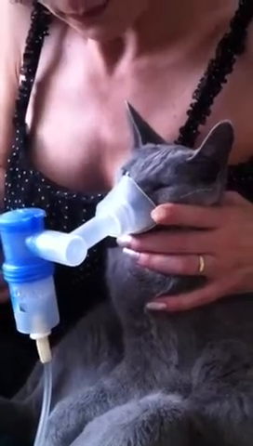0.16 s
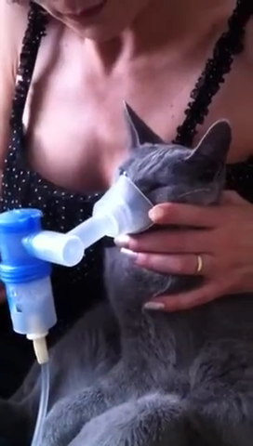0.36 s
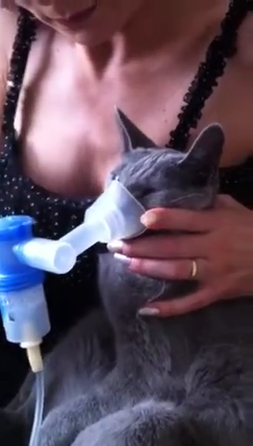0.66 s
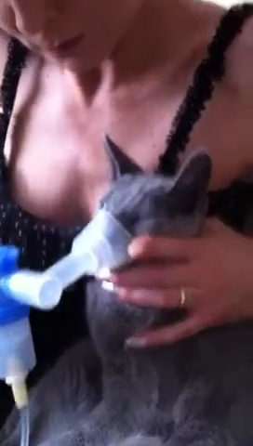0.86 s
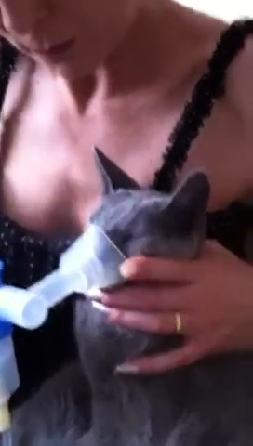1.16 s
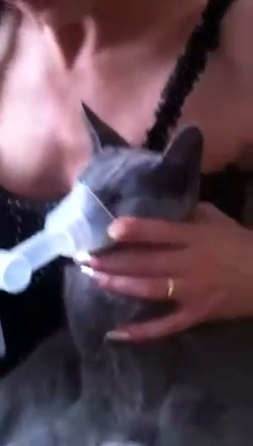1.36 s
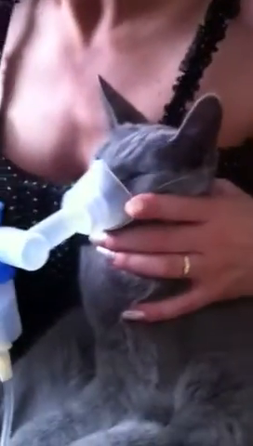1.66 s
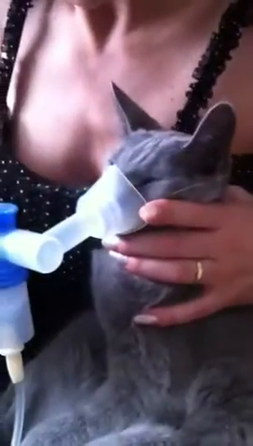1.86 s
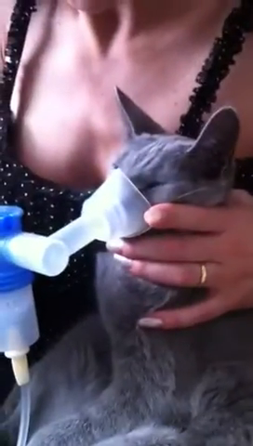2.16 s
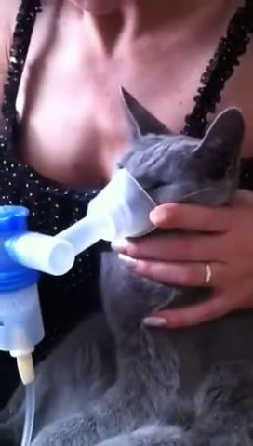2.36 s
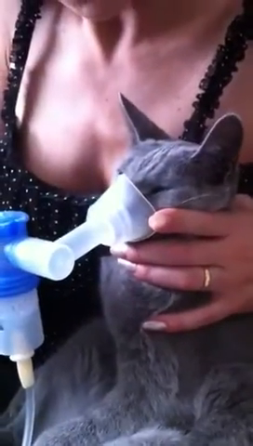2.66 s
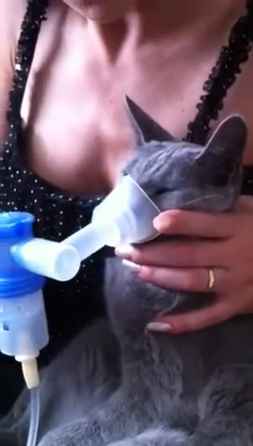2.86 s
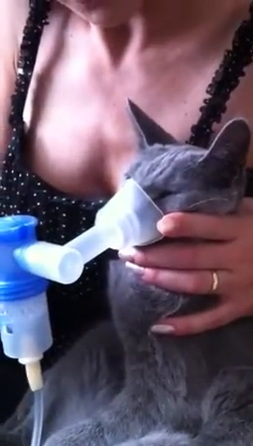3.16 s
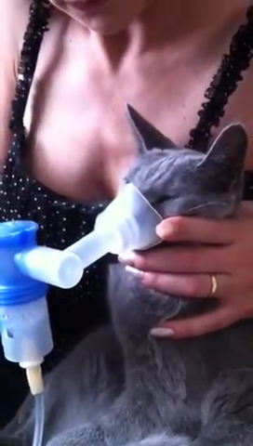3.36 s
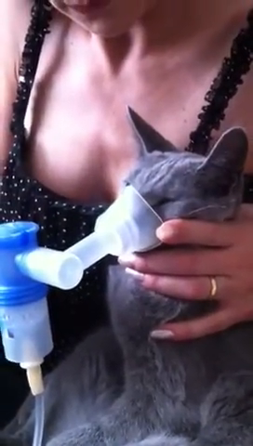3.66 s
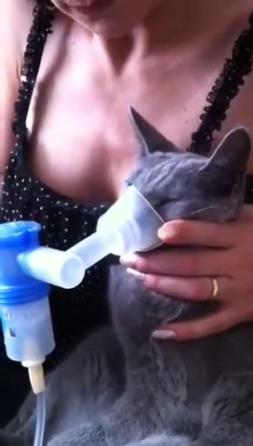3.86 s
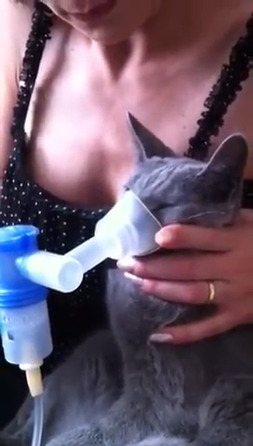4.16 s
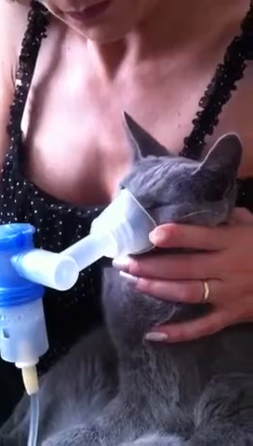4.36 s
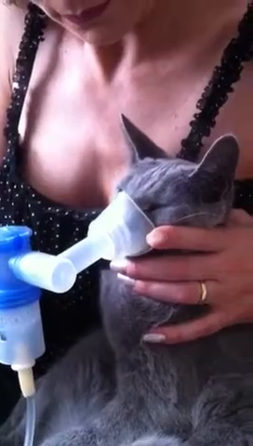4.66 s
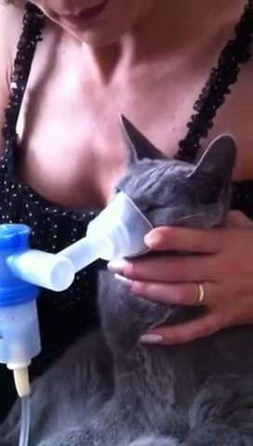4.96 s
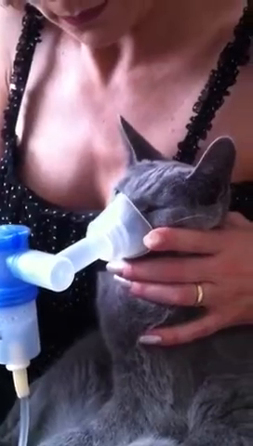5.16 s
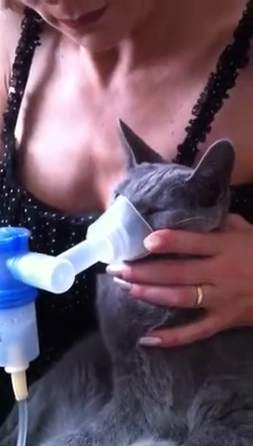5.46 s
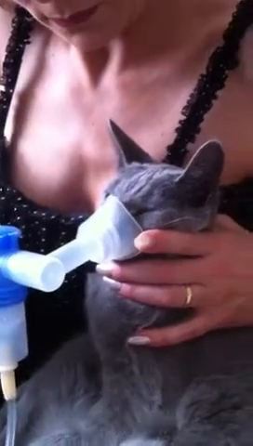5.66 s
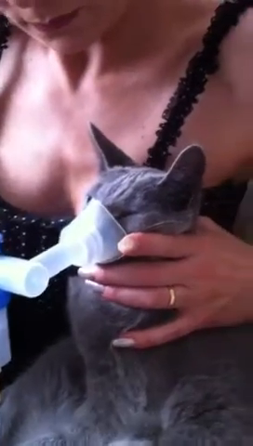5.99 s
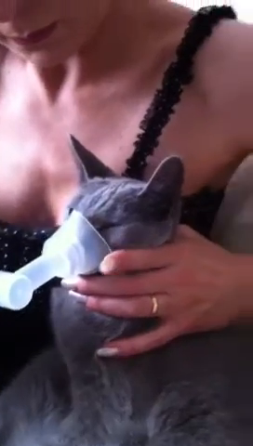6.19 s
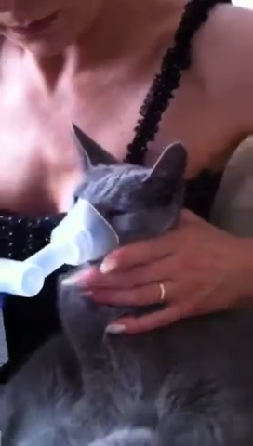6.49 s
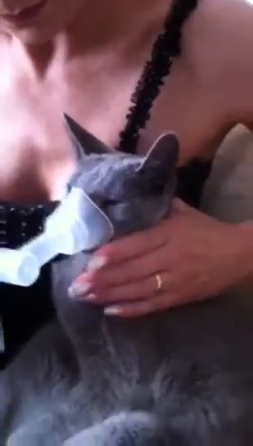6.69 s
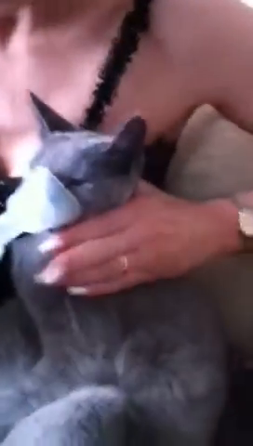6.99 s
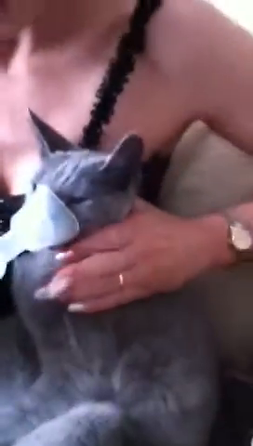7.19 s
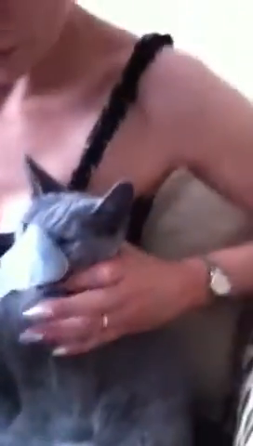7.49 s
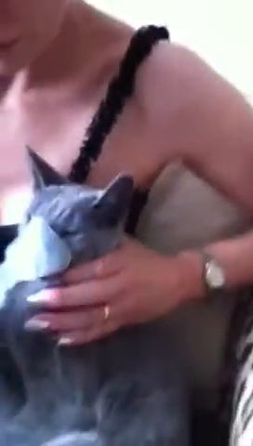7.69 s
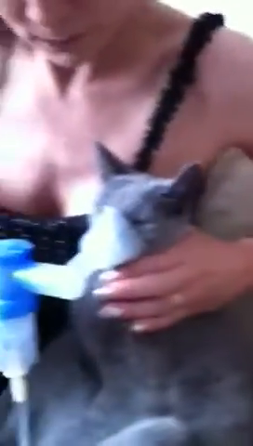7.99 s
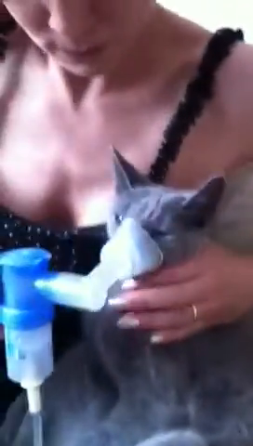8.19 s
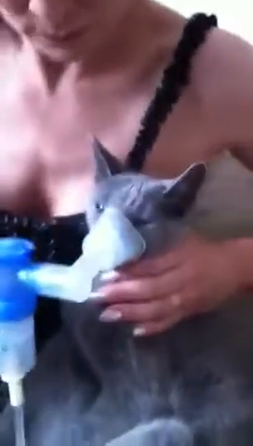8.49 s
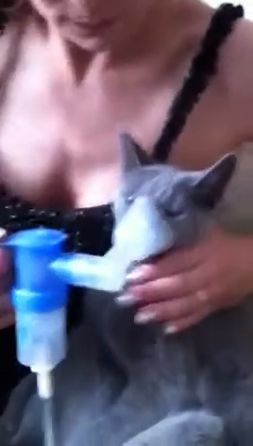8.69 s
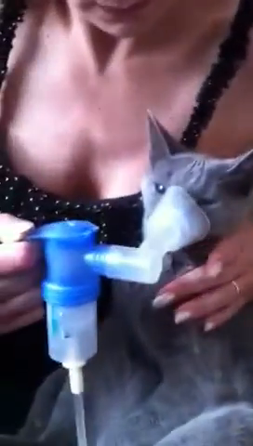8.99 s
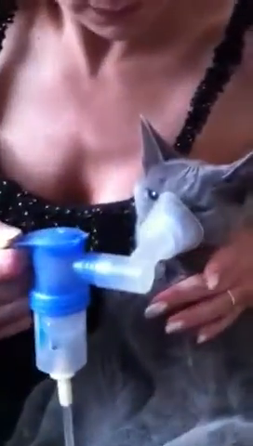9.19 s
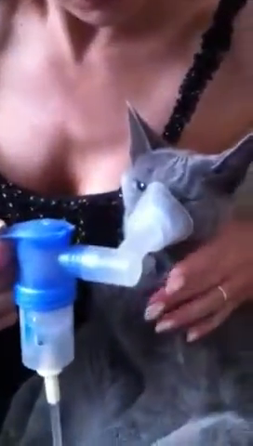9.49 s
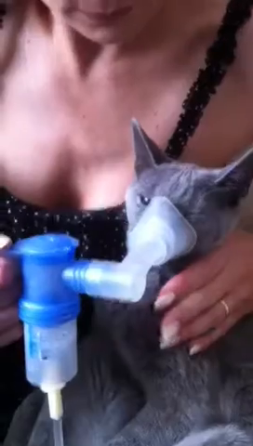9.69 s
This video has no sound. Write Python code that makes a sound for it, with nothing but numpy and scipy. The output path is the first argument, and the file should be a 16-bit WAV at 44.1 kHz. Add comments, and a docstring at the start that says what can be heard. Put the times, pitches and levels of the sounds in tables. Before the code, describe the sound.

Indoors, a nebulizer runs without pause: buzzing low-mid motor hum, airy high hiss and a subtle bubbling sputter from the cup. The level stays nearly even with slight flutter. After more than seven seconds a tight pair of plastic clicks snaps close to the microphone, and the tone smoothly changes as cup and microphone turn. The cat makes no sound. Mono, close and dry.

```python
"""A nebulizer runs while its mask is held to a cat's face; the cat itself stays silent.
From the start the piston compressor hums at 44 turns a second over a low rumble, while spray sputters
and gurgles in the plastic medicine cup and the air jet hisses. At 3.6 s the hum's phase slips by a fraction
of a millisecond, with a faint low bump. Just after 7.6 s two sharp clicks sound close by, the louder with a bump.
Around 8 s cup and microphone turn smoothly, which changes the colour of hiss, gurgle and hum."""
import sys
import numpy as np
from scipy import signal
from scipy.fft import rfft, irfft, next_fast_len
from scipy.io import wavfile
from scipy.ndimage import uniform_filter1d, map_coordinates

SR = 44100
rng = np.random.default_rng(int(sys.argv[2]) if len(sys.argv) > 2 else 0)


def to_wav(sig):
    """Store sig (one row per channel, or 1-D mono) as 16-bit WAV at the path in sys.argv[1].

    Samples outside -1..1 are clipped; the rate is SR.
    """
    pcm = np.clip(np.atleast_2d(sig), -1, 1) * 32767
    pcm = np.round(pcm).astype(np.int16)
    wavfile.write(sys.argv[1], SR, pcm.T)  # frames by channels


N = 433944

SHAFT_HZ = 44.335
# piston and valve knocks of one turn: (place in the turn [0-1], signed push [relative])
KNOCKS = [(.32, .58), (.357, .69), (.404, .16), (.766, 1)]
# resonances of the pump housing: (centre [Hz], width [Hz], weight [dB])
HOUSING_MODES = [(280, 30, .6), (675, 41, 0), (860, 60, 4)]
# hum lines of the shaft, before facing and flutter:
# (shaft multiple, rms level before the turn [dB], rms level after it [dB])
HUM_LINES = [(2, -80.0, -80), (3, -72.5, -72), (4, -52.0, -51.2), (5, -68, -68), (6, -52.5, -53.6),
             (7, -65, -66.5), (8, -61, -99), (9, -65, -58.5), (10, -68, -62.5), (11, -66, -58.5),
             (12, -67, -65), (13, -59, -54), (14, -52.5, -52), (15, -55.5, -47), (16, -47, -48),
             (17, -54.5, -56), (18, -67.5, -95), (19, -64, -61), (20, -56.5, -60.5), (21, -61.5, -76),
             (22, -68, -64), (23, -71, -70)]
# faint upper buzz of the pump, before chance spread and flutter: (frequency [Hz], rms level per line [dB])
UPPER_BUZZ = [(1060, -75), (1500, -74), (1900, -79), (2200, -82), (2700, -85.5)]
# steady motor tones: (frequency [Hz], rms level [dB])
MOTOR_TONES = [(100, -86), (144.3, -66), (786.7, -67), (875.4, -70)]
# how openly the pump faces the microphone: (time [s], gain [dB])
PUMP_FACING = [(1.0, -1.0), (1.5, -0.6), (5.9, -0.35), (7.4, 1), (8.5, -0.04)]


def compressor(turns, flutter_db=0.22):
    """Each turn repeats the same knocks, so the pump sounds as a stack of lines at shaft multiples."""
    t = np.arange(N) / SR
    turned = turned_share()
    facing = amp(curves(PUMP_FACING)[0])
    shaft = np.exp(2j * np.pi * turns)
    hum = np.zeros(N)
    for multiple, first_db, turned_db in HUM_LINES:
        hz = multiple * SHAFT_HZ
        # knocks and housing set only the phase: when in the turn each line peaks
        drive = sum(push * np.exp(-2j * np.pi * multiple * place) for place, push in KNOCKS)
        body = sum(amp(db) * 1j * hz * width / (centre ** 2 - hz ** 2 + 1j * hz * width)
                   for centre, width, db in HOUSING_MODES)
        phase = drive * body / abs(drive * body)
        level = amp(first_db) * (1 - turned) + amp(turned_db) * turned
        if hz > 500:
            level = level * facing  # only the short waves are shaded
        hum += level * np.real(shaft ** multiple * phase)
    for multiple in range(24, 61):
        level = amp(along(UPPER_BUZZ, multiple * SHAFT_HZ) + 2 * rng.normal())
        phase = np.exp(2j * np.pi * rng.random())
        hum += level * np.real(shaft ** multiple * phase)
    motor = sum(amp(db) * np.cos(2 * np.pi * (hz * t + rng.random())) for hz, db in MOTOR_TONES)
    flutter = amp(flutter_db * wobble(rate=28))
    return np.sqrt(2) * (hum * flutter + motor)  # root 2 makes the line levels rms


MAINS_HZ = 50
START_TURNS = .087  # phase at the start
PHASE_SLIP = (3.572, .006, .016)  # the hum's phase slips ahead once: (time [s], length [s], slip [turns])


def shaft_turns(hunt=0.0023, jitter=0.00032, drift=0.0033):
    """Phase of hum and strokes in turns; the motor's torque ripple beats with the two strokes 11 times a second."""
    t = np.arange(N) / SR
    beat = np.sin(2 * np.pi * 2 * (MAINS_HZ - SHAFT_HZ) * t)
    when, length, slipped = PHASE_SLIP
    slip = slipped * np.clip((t - when) / length, 0, 1)
    unevenness = hunt * beat + jitter * wobble(rate=29) + drift * wobble(rate=3)
    return START_TURNS + SHAFT_HZ * t + slip + unevenness


# colour of the spray's hiss in the cup, before and after the turn: (frequency [Hz], relative density [dB])
HISS_FIRST = [(1940, -42), (3300, -22), (3650, -20.5), (3870, -4.5), (3990, -2), (4150, -3.5), (4330, -10),
              (4500, -7), (4850, -4), (5030, 0.5), (5190, 7.5), (5360, 0), (5830, -12.5), (6350, -15),
              (6700, -47), (8710, -48), (14700, -120)]
HISS_TURNED = [(1940, -26), (3300, -17), (3540, -17), (3820, 1), (4010, -0.5), (4150, -6), (4570, 1.5),
               (4850, 1.5), (5210, 7.5), (5410, 3), (5830, -8), (6490, -19), (6700, -30), (8710, -54),
               (14700, -120)]
# colour of the liquid's gurgle, before and after the turn: (frequency [Hz], relative density [dB])
GURGLE_FIRST = [(700, -41), (1000, -14.5), (1300, -7), (1470, -5.5), (1580, 1.5), (1720, -10.5),
                (1950, -17.5), (2600, -24.5), (3400, -45)]
GURGLE_AFTER_TURN = [(700, -36), (1000, -18), (1150, 0.5), (1330, -3), (1540, 2), (1720, -5.5), (1950, -16),
                     (2600, -25), (3400, -52)]
# hiss of the spray as the hand-held cup sways, before surges: (time [s], level [dB])
CUP_SWAY = [(.7, -48.7), (1.7, -46), (6.0, -47), (6.8, -46), (8.4, -48), (9.1, -46.5)]
# the gurgle's level before surges [dB], depth of its chance surges [dB], their rate [knots per s]
GURGLE_DB, SURGE_DB, SURGE_RATE = -55, 0.95, 5
STROKE_PLACE = 0.63  # place of the pressure stroke in the turn (0-1)


def mist(turns, hiss_surge_db=0.63):
    """Liquid is torn up in spurts, which gurgle low and hiss in the cup's resonances."""
    turned = turned_share()

    def in_cup(x, first, last):
        """Crossfade from the first colour to the last as the cup turns."""
        return (1 - turned) * coloured(x, first) + turned * coloured(x, last)

    surge = wobble(SURGE_RATE)
    gurgle = in_cup(sputter(rate=90, depth_db=2.0), GURGLE_FIRST, GURGLE_AFTER_TURN)
    # each pressure stroke throws more spray
    spray = sputter(rate=130, depth_db=0.7) * stroke(turns, STROKE_PLACE, depth_db=0.5)
    hiss = in_cup(spray, HISS_FIRST, HISS_TURNED)
    gurgle_gain = amp(GURGLE_DB + SURGE_DB * surge)
    hiss_gain = amp(curves(CUP_SWAY)[0] + hiss_surge_db * surge)
    return gurgle_gain * gurgle + hiss_gain * hiss


def sputter(rate, depth_db):
    """White noise that comes in uneven spurts."""
    return rng.standard_normal(N) * amp(depth_db * wobble(rate))


def stroke(turns, place, depth_db):
    """A gain that swells once a turn, at the given place in the turn."""
    return amp(depth_db * np.cos(np.pi * (turns - place)) ** 8)


# colour of the escaping air: (frequency [Hz], relative density [dB])
JET_AIR = [(1500, -21), (2100, -1), (2750, -5), (3200, -1.5), (4500, -17), (6700, -9), (8500, -4),
           (10200, -5.5), (12300, 2.5), (13300, -2), (14200, -15), (15600, -7.5)]
# narrow resonances of the nozzle and mouthpiece: (centre [Hz], width [Hz], lift [dB])
NOZZLE_PEAKS = [(7250, 380, 7), (9500, 320, 5.5), (10820, 270, 5)]
# level against the cup's mean hiss [dB], share of the sway it follows, gain once the cup has turned [dB]
JET_UNDER_DB, JET_FOLLOWS, JET_TURNED_DB = -9.5, 0.63, 0.7


def jet(drift_db=1.76):
    """Smooth high hiss of air leaving the nozzle; colour drifts by chance, level partly follows the sway."""
    frames = signal.stft(rng.standard_normal(N), nperseg=1024)[2]
    # a chance gain for every band and moment, smoothed over about 300 Hz and 1 s
    across_bands = uniform_filter1d(rng.standard_normal(frames.shape), size=7, axis=0)
    drift = unit(uniform_filter1d(across_bands, size=90, axis=1))
    noise = signal.istft(frames * amp(drift_db * drift), nperseg=1024)[1][:N]

    def nozzle_lift(hz):
        """Bell-shaped lift around each resonance, in dB."""
        return sum(db * np.exp(-((hz - centre) / width) ** 2) for centre, width, db in NOZZLE_PEAKS)

    air = filtered(noise, lambda hz: amp(along(JET_AIR, hz) + nozzle_lift(hz)))
    cup_db = curves(CUP_SWAY)[0]
    sway_db = JET_FOLLOWS * (cup_db - cup_db.mean())
    level_db = cup_db.mean() + JET_UNDER_DB + sway_db + JET_TURNED_DB * turned_share()
    return amp(level_db) * unit(air)


TURN_S, TURN_EASE_S = 7.98, 0.38  # middle of the turn and its time scale


def turned_share():
    """How far cup and microphone have turned in one smooth move, 0-1."""
    return .5 + .5 * np.tanh((np.arange(N) / SR - TURN_S) / (2 * TURN_EASE_S))


# clicks: (time [s], peak level of the knock [dB])
CLICK_TIMES = [(7.6212, -20.5), (7.6571, -12.5)]
# colour of a click's first snap: (frequency [Hz], relative level [dB])
SNAP_COLOUR = [(100, -40), (1500, -16), (4700, 3), (7200, -7.5), (9300, 1.5), (11500, -4), (15000, -18)]
# colour of the plastic's knock and rebound: (frequency [Hz], relative level [dB])
KNOCK_COLOUR = [(40, -38), (300, -24), (600, 2), (1200, 4), (2400, 5), (3400, 0), (5000, -5.5), (9000, -26)]


def clicks(snap_db=-2, knock_db=0, lag=.00055, rebound_db=-12, rebound=0.001665):
    """Hard dry clicks: a bright snap, then the knock of the plastic and its small rebound."""
    # (delay [s], gain [dB], colour)
    parts = [(0, snap_db, SNAP_COLOUR), (lag, knock_db, KNOCK_COLOUR), (rebound, rebound_db, KNOCK_COLOUR)]
    out = np.zeros(N)
    for s, db in CLICK_TIMES:
        for delay, gain_db, colour in parts:
            impulse = causal(colour)
            out[round((s + delay) * SR):][:len(impulse)] += amp(db + gain_db) * impulse
    return out


# soft low bumps: (time [s], peak level [dB])
BUMP_TIMES = [(3.574, -51), (7.657, -48)]
# colour of a bump: (frequency [Hz], relative level [dB])
BUMP_COLOUR = [(25, -4), (70, 0), (250, 3), (700, -12), (2000, -45)]


def bumps():
    """Short low impulses, one near the phase slip and one with the louder click."""
    out, impulse = np.zeros(N), causal(BUMP_COLOUR, size=4096)
    for s, db in BUMP_TIMES:
        out[round(s * SR):][:len(impulse)] += amp(db) * impulse
    return out


# noise of the pump and room: (frequency [Hz], relative density [dB])
RUMBLE_COLOUR = [(20, -27), (65, -29), (110, -17), (170, -5.5), (260, -4), (340, -5), (480, -3.5),
                 (555, -5), (700, 1.5), (770, -4), (820, 5), (890, 1), (1050, -3.5), (1500, -30)]


def rumble(level_db=-56.0):
    """Air churns in the pump as steady noise and fills the gaps between its lines."""
    return amp(level_db) * coloured(rng.standard_normal(N), RUMBLE_COLOUR)


def amp(db):
    """Decibels to gain."""
    return 10 ** (np.asarray(db) / 20)


def unit(x):
    """Scale to rms 1."""
    return x / np.sqrt(np.mean(x ** 2) + 1e-20)


def along(points, hz):
    """(frequency [Hz], value) points read on a log axis."""
    f, v = np.transpose(points)
    return np.interp(np.log(hz + 1), np.log(f + 1), v)


def curves(rows):
    """One value per sample for each column after the time."""
    s, *cols = np.transpose(rows)
    return [np.interp(np.arange(N) / SR, s, c) for c in cols]


def wobble(rate):
    """A smooth random curve, rate knots a second."""
    knots = rng.standard_normal(int(N * rate / SR) + 4)
    return map_coordinates(knots, [np.arange(N) * rate / SR])


def filtered(x, response):
    """x times a response of frequency."""
    m = next_fast_len(N + SR // 2)
    return irfft(rfft(x, m) * response(np.fft.rfftfreq(m, 1 / SR)), m)[:N]


def coloured(x, spectrum):
    """x filtered by the given spectrum, at rms 1."""
    return unit(filtered(x, lambda hz: amp(along(spectrum, hz))))


def causal(spectrum, size=1024):
    """Minimum-phase impulse with this spectrum, its energy as early as possible, at peak 1."""
    cepstrum = irfft(np.log(amp(along(spectrum, np.fft.rfftfreq(size, 1 / SR)))))
    # fold the cepstrum onto positive times
    cepstrum[1:size // 2] *= 2
    cepstrum[size // 2 + 1:] = 0
    impulse = irfft(np.exp(rfft(cepstrum)))
    return impulse / abs(impulse).max()


def scene():
    """One shaft drives hum and spray; all sounds reach one microphone."""
    turns = shaft_turns()
    machine = compressor(turns) + rumble()
    cup = mist(turns) + jet()
    return (machine + cup + clicks() + bumps())[None]


TOP_HZ = 15800


def record(dry):
    """The recorder keeps nothing above its band limit."""
    return np.array([filtered(x, lambda hz: hz < TOP_HZ) for x in dry])


dry = scene()
out = record(dry)
to_wav(out)
```